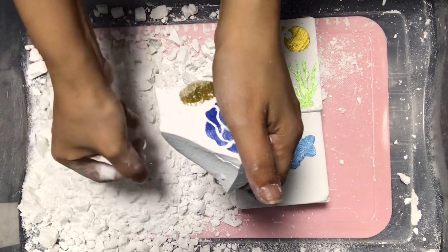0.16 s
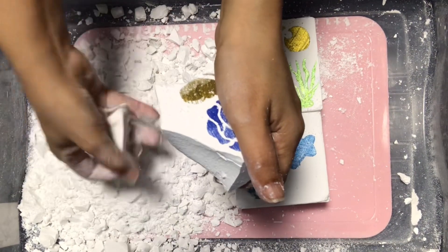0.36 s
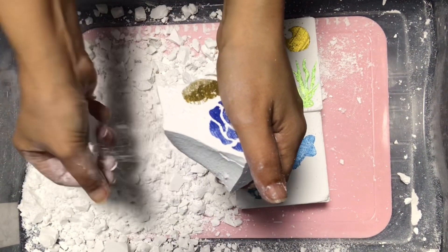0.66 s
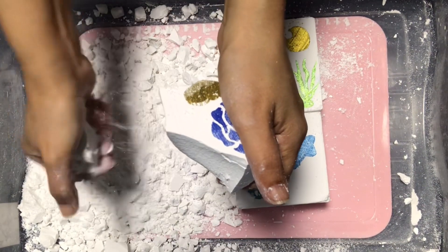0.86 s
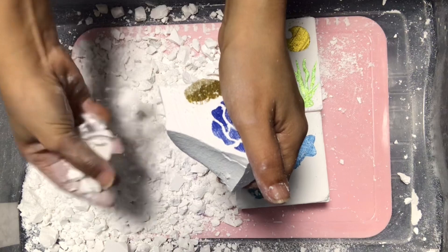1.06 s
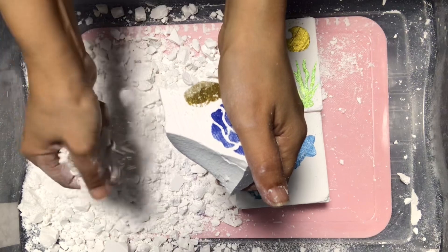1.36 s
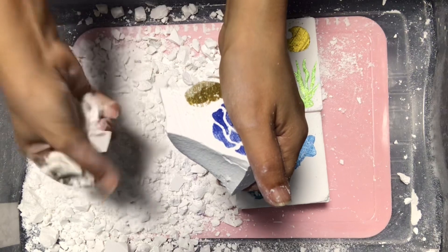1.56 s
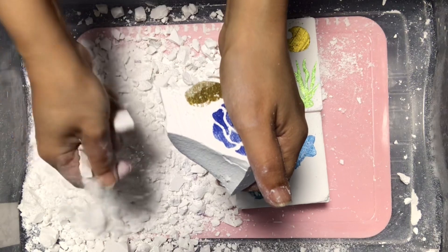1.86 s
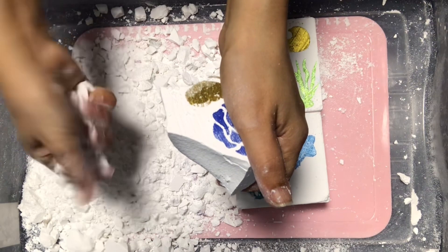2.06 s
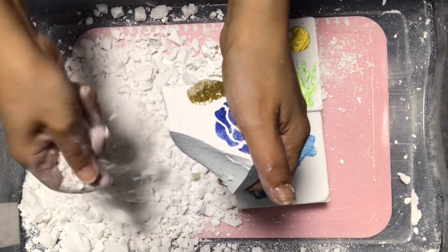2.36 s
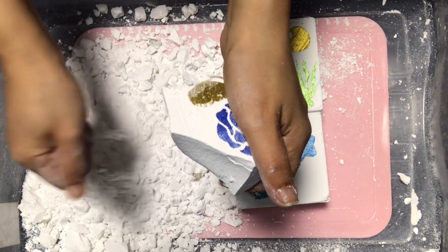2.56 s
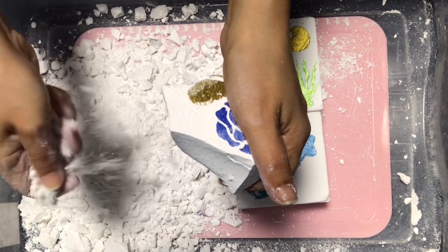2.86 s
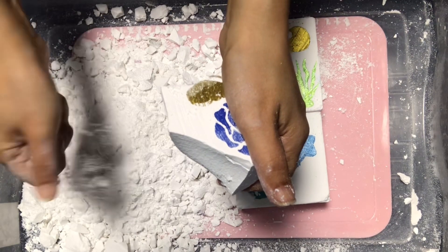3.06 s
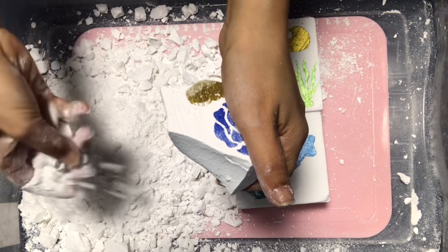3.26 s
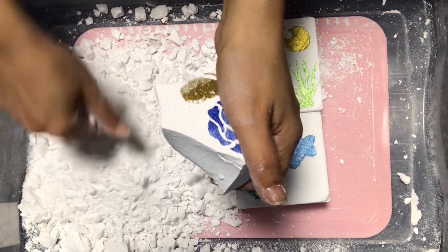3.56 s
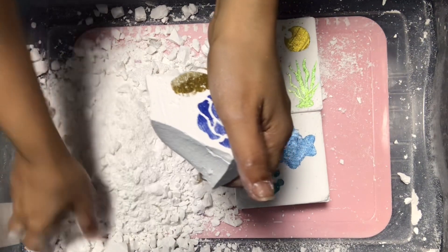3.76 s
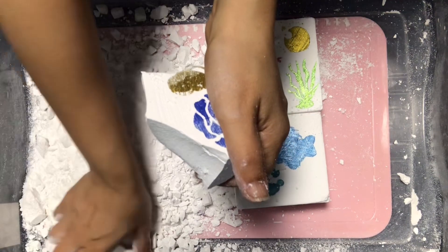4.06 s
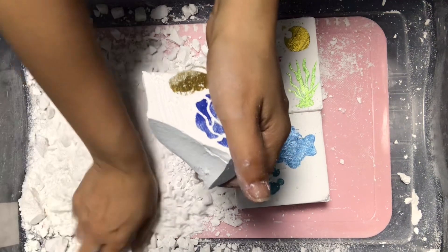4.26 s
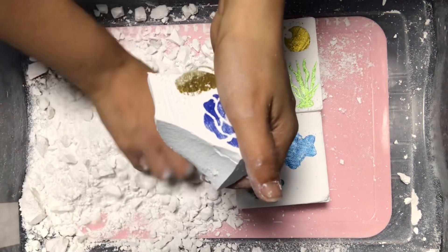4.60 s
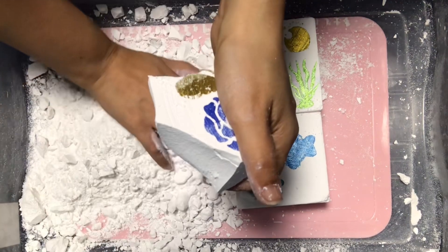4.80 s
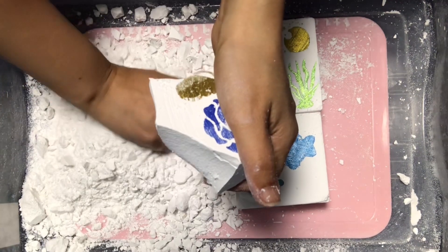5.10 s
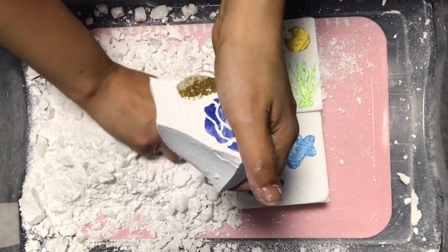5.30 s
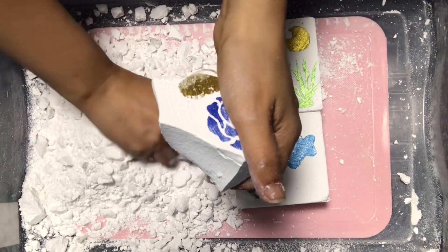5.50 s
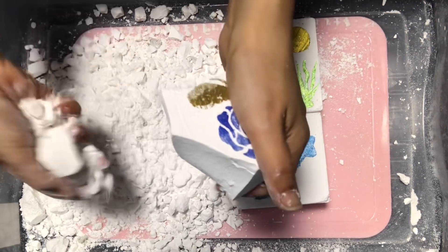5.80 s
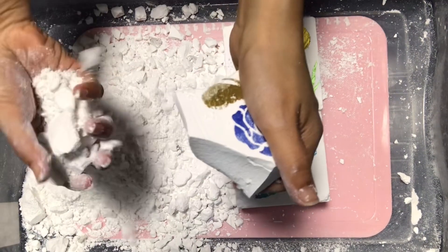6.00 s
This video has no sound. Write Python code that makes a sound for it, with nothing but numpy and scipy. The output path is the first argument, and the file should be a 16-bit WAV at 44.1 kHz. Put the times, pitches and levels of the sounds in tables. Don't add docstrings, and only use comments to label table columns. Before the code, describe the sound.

Brittle chalk breaks in a squeezing fist, close to the microphone, in dense bursts of sharp cracks, the loudest slightly overloaded. Bright splinters tick and small pieces drop onto a plastic tray. Later the hand rakes powdery crumbs in short rough strokes with low bumps and clacking lumps, then pauses and lightly squeezes a last handful. The room is dry and quiet.

```python
import sys
import numpy as np
from scipy import signal
from scipy.fft import rfft, irfft, next_fast_len
from scipy.io import wavfile

SR = 44100
rng = np.random.default_rng(int(sys.argv[2]) if len(sys.argv) > 2 else 0)


def ratio_of_db(decibels):
    return 10 ** (np.asarray(decibels, float) / 20)


def wav_out(sig):
    wavfile.write(sys.argv[1], SR, np.round(np.clip(np.atleast_2d(sig).T, -1, 1) * 32767).astype(np.int16))


N = 270774


def rms_one(x):
    return x / np.sqrt(np.mean(x ** 2) + 1e-20)


def peak_one(x):
    return x / (np.max(np.abs(x)) + 1e-20)


def band(x, low_hz, high_hz, order=2):
    edges_hz = [low_hz, min(high_hz, 0.45 * SR)]
    return signal.sosfilt(signal.butter(order, edges_hz, "band", fs=SR, output="sos"), x)


def resonate(x, hz, width_hz):
    r = np.exp(-np.pi * width_hz / SR)
    poles = [1, -2 * r * np.cos(2 * np.pi * hz / SR), r * r]
    return signal.lfilter(np.array([1, 0, -1]) * (1 - r * r) / 2, poles, x)


def colour(x, spectrum):
    size = next_fast_len(N)
    hz, level_db = np.transpose(spectrum)
    bins_hz = np.arange(size // 2 + 1) * SR / size
    gain = ratio_of_db(np.interp(np.log(bins_hz + 1), np.log(hz), level_db))
    return rms_one(irfft(rfft(x, size) * gain, size)[:N])


def drift(rate_hz):
    r = np.exp(-2 * np.pi * rate_hz / SR)
    slow = signal.lfilter([1], [1, -2 * r, r * r], rng.standard_normal(N + SR))
    return rms_one(slow[SR:])


def grains(per_s, spread_db, clump_db, clump_rate_hz):
    sizes = ratio_of_db(spread_db * np.minimum(rng.exponential(1, N), 3.6)) * rng.choice([-1, 1], N)
    born = rng.random(N) < per_s / SR
    return rms_one(sizes * born * ratio_of_db(clump_db * drift(clump_rate_hz)) + 1e-18)


def add(out, start_s, x):
    i = round(start_s * SR)
    out[i:i + len(x)] += x[:N - i]


# hz, density_db
ROOM_SPECTRUM = [(24, -74), (45, 0), (90, 3.5), (430, -5.5), (620, -6), (4700, -20), (15800, -25),
                 (17000, -64)]


def room():
    return ratio_of_db(-43) * colour(rng.standard_normal(N), ROOM_SPECTRUM)


def echoes(x):
    t = np.arange(SR // 4) / SR
    t60_s, first_echo_s = 0.14, 0.002
    tail = rng.standard_normal(len(t)) * ratio_of_db(-60 * t / t60_s) * (t > first_echo_s)
    tail = band(tail, 430, 7200, order=1)
    return ratio_of_db(-19) * signal.fftconvolve(x, tail / np.sqrt(np.sum(tail ** 2)))[:N]


def swells(moves, rest_db):
    rise_db_per_s, fall_db_per_s = 383, 266
    t = np.arange(0, N + 32, 32) / SR
    power = ratio_of_db(2 * rest_db)
    for start_s, length_s, level_db in moves:
        rise_loss_db = rise_db_per_s * np.maximum(start_s - t, 0)
        fall_loss_db = fall_db_per_s * np.maximum(t - start_s - length_s, 0)
        power = power + ratio_of_db(2 * (level_db - np.minimum(rise_loss_db + fall_loss_db, 80)))
    return np.interp(np.arange(N) / SR, t, 10 * np.log10(power))


# start_s, length_s, grit_db, rain_db (crumbs raining on the tray)
SQUEEZES = [(0, 0.01, -30.5, -44.5), (0.062, 0.011, -33, -47), (0.19, 0.033, -57, -36),
            (0.389, 0.012, -34.5, -44), (0.523, 0.17, -42, -59), (0.786, 0.024, -29.5, -42),
            (0.953, 0.069, -38.5, -61), (1.09, 0.11, -36.5, -45.5), (1.246, 0.1, -32.5, -44),
            (1.396, 0.032, -34, -49), (1.525, 0.13, -41.5, -52), (1.705, 0.057, -38.5, -45.5),
            (1.865, 0.076, -33.5, -40.5), (2.002, 0.16, -42, -41), (2.237, 0.088, -38, -41.5),
            (2.366, 0.15, -36.5, -41), (2.686, 0.025, -38, -61), (2.847, 0.21, -40, -49),
            (3.268, 0.18, -43, -46.5), (3.485, 0.041, -34.5, -36), (3.63, 0.035, -43, -39.5),
            (5.936, 0.098, -48.5, -42)]
# start_s, length_s, drag_db, dull_share_db, bright_share_db
STROKES = [(3.788, 0.043, -36, -4, -12), (3.898, 0.069, -38, -1.5, -2.5), (3.96, 0.021, -46.5, 5, 0),
           (4.017, 0.047, -33.5, -2.5, -5), (4.106, 0.11, -41, 0, -1), (4.193, 0.039, -46, 1, 3),
           (4.246, 0.019, -39.5, 3, 6.5), (4.284, 0.092, -39, -4, -8), (4.404, 0.19, -46.5, -5.5, -9),
           (4.558, 0.1, -41.5, -5.5, -10.5), (4.74, 0.053, -40.5, -7.5, -8),
           (4.886, 0.029, -37.5, -4.5, -8), (4.951, 0.021, -34.5, -7, -11), (5.01, 0.032, -33.5, -7.5, -15),
           (5.104, 0.025, -34, -4, -11), (5.174, 0.052, -37, -3.5, -11), (5.302, 0.0081, -30, -9, -13),
           (5.356, 0.025, -32.5, -12, -15.5), (5.445, 0.036, -38.5, -3, -13)]
# grit_db, drag_db, rumble_db, dull_db, bright_db
REST_DB = [-51, -58, -54.5, -54, -52]


def hand():
    dust_db, rain_drag_db, stroke_rumble_db = -16.5, -11, 4
    grit = [(s, n, grit_db) for s, n, grit_db, _ in SQUEEZES]
    dust = [(s, n, grit_db + dust_db) for s, n, grit_db in grit]
    rain = [(s, n, rain_db) for s, n, _, rain_db in SQUEEZES]
    rain_drag = [(s, n, rain_db + rain_drag_db) for s, n, rain_db in rain]
    drag = [(s, n, drag_db) for s, n, drag_db, _, _ in STROKES]
    rumble = [(s, n, drag_db + stroke_rumble_db) for s, n, drag_db in drag]
    dull = [(s, n, drag_db + share_db) for s, n, drag_db, share_db, _ in STROKES]
    bright = [(s, n, drag_db + share_db) for s, n, drag_db, _, share_db in STROKES]
    moves = [grit, rain_drag + drag, rain + rumble, dust + dull, dust + bright]
    return [swells(each, rest_db) for each, rest_db in zip(moves, REST_DB)]


def rolling(level_db, peaks, per_s):
    knocks = grains(per_s, spread_db=3.0, clump_db=2.2, clump_rate_hz=28)
    out = np.zeros(N)
    for hz, width_hz, peak_db in peaks:
        out += ratio_of_db(peak_db) * resonate(resonate(knocks, hz, width_hz), hz, width_hz)
    return ratio_of_db(level_db) * rms_one(out)


# pitch_hz, width_hz, level_db
TRAY_PEAKS = [(131.5, 102, 0.5), (233.3, 48.5, 6.5), (350, 176, 3.5), (460, 150, -0.5), (532, 770, -10.5)]


def rumble(level_db):
    return rolling(level_db, TRAY_PEAKS, per_s=1800)


# pitch_hz, width_hz, level_db
DRAG_PEAKS = [(760, 550, 1), (1147, 410, 6.5), (1853, 180, 10), (2210, 210, 5.5), (2560, 620, -1.5),
              (2980, 240, -6)]


def drag(level_db):
    return rolling(level_db, DRAG_PEAKS, per_s=1500)


def powder(level_db, spectrum, patchy_db):
    return ratio_of_db(level_db + patchy_db * drift(32)) * colour(rng.standard_normal(N), spectrum)


# hz, density_db
DULL_POWDER = [(1500, -11), (2500, -1), (4500, 0.5), (6500, -3.5), (10000, -30), (17000, -40)]


def dull_powder(level_db):
    return powder(level_db, DULL_POWDER, patchy_db=2.2)


# hz, density_db
BRIGHT_POWDER = [(3500, -18), (6000, -4), (8000, -0.5), (13500, -11.5), (15700, -6.5), (16300, -40)]


def bright_powder(level_db):
    return powder(level_db, BRIGHT_POWDER, patchy_db=1.8)


# hz, density_db
GRIT_SPECTRUM = [(1200, -3), (2000, -3.5), (4700, -1.5), (8000, -3.5), (12000, -10), (15800, -4),
                 (17000, -64)]


def grit(level_db):
    edges_hz = np.geomspace(1200, 18000, 8)
    out = np.zeros(N)
    for low_hz, high_hz in zip(edges_hz, edges_hz[1:]):
        clicks = grains(per_s=1500, spread_db=4.6, clump_db=3.0, clump_rate_hz=45)
        out += band(clicks, low_hz, high_hz, order=1)
    return ratio_of_db(level_db) * colour(out, GRIT_SPECTRUM)


def squeak():
    start_s, note_s, scrape_s = 3.819, 0.003, 0.0066
    pitch_hz, rise_hz_per_s = 2250, 21000
    t = np.arange(N) / SR - start_s
    phase = 2 * np.pi * (pitch_hz * t + 0.5 * rise_hz_per_s * t * t)
    note = ratio_of_db(2.5 * drift(150)) * (np.sin(phase) + ratio_of_db(-22) * np.sin(2 * phase))
    note = np.exp(-0.5 * (t / note_s) ** 2) * note
    scrape = rms_one(resonate(rng.standard_normal(N), pitch_hz, 900))
    scrape = np.exp(-0.5 * (t / scrape_s) ** 2) * scrape
    return ratio_of_db(-17.5) * (note + ratio_of_db(-10) * scrape)


# start_s, level_db, pitch_hz, t60_s
THUDS = [(0.054, -22.5, 506, 0.012), (0.168, -14, 378, 0.022), (0.193, -18.5, 420, 0.093),
         (0.534, -25.5, 426, 0.029), (0.62, -21.5, 405, 0.017), (0.77, -11.5, 420, 0.016),
         (1.128, -23, 420, 0.031), (1.85, -33, 580, 0.041), (1.882, -15.5, 262, 0.051),
         (2.027, -18.5, 276, 0.046), (2.236, -25, 255, 0.043), (2.358, -27, 230, 0.034),
         (2.413, -24.5, 460, 0.099), (3.481, -27.5, 261, 0.048)]
# start_s, level_db, pitch_hz, t60_s
SHOVES = [(3.784, -23.5, 200, 0.05), (3.834, -19.5, 408, 0.087), (3.922, -15, 422, 0.05),
          (4.011, -11.5, 237, 0.094), (4.035, -31, 220, 0.062), (4.059, -11, 368, 0.04),
          (4.176, -34, 355, 0.09), (4.24, -30, 294, 0.079), (4.287, -11.5, 371, 0.032),
          (4.646, -31, 204, 0.093), (4.893, -26.5, 291, 0.17), (4.942, -16.5, 457, 0.095),
          (5.03, -23, 260, 0.071), (5.087, -30, 504, 0.12), (5.174, -37, 350, 0.066),
          (5.292, -20, 349, 0.18), (5.343, -21, 362, 0.083), (5.465, -23, 384, 0.041)]
# start_s, level_db, pitch_hz, t60_s
BUMPS = [
    (3.77, -30.5, 75.4, 0.28),
    (3.932, -36, 59.5, 0.17),
    (4.011, -28, 99, 0.13),
    (4.07, -37, 60, 0.44),
]
# start_s, level_db, pitch_hz, t60_s
DROPS = [
    (2.668, -36, 460, 0.047),
    (2.734, -44, 270, 0.053),
    (2.848, -43, 340, 0.057),
    (2.888, -31.5, 407, 0.055),
    (2.97, -39, 189, 0.067),
    (3.086, -39, 229, 0.065),
    (3.139, -32.5, 238, 0.13),
    (3.312, -33, 227, 0.06),
    (3.566, -33, 440, 0.068),
    (3.638, -31, 420, 0.078),
]


def thuds():
    tray_low_hz, tray_high_hz, low_lasts = 238, 420, 0.85
    out, t = np.zeros(N), np.arange(5000) / SR
    sagging = 2 * np.pi * (t + 0.00099 * (1 - np.exp(-t / 0.0019)))
    for start_s, level_db, pitch_hz, t60_s in THUDS + SHOVES + BUMPS + DROPS:
        shift = rng.random(2) * 2 * np.pi
        t60_s = max(t60_s, 0.01)
        partner_hz, lasts = (tray_low_hz, low_lasts) if pitch_hz > 320 else (tray_high_hz, 1 / low_lasts)
        ring = np.sin(pitch_hz * sagging) + 0.26 * np.sin(1.457 * pitch_hz * sagging + shift[0])
        ring = ring * ratio_of_db(-60 * t / t60_s)
        partner = ratio_of_db(-4.5 - 60 * t / (lasts * t60_s)) * np.sin(partner_hz * sagging + shift[1])
        partner = partner * (pitch_hz > 150)
        push = np.minimum(t / 0.0033, 1)
        add(out, start_s + 0.0018, ratio_of_db(level_db + 2) * peak_one((ring + partner) * push))
    return out


# start_s, pitch_hz, level_db, t60_s
CLINKS = [
    (.081, 10450, -26, .024),
    (.172, 10700, -30, .045),
    (3.637, 8790, -22, .05),
    (.773, 2245, -7, .035),
    (.774, 2600, -14, .05),
    (.784, 2430, -21, .07),
    (.772, 3985, -5, .04),
    (.773, 1570, -11, .04),
]


def clinks():
    out, t = np.zeros(N), np.arange(4096) / SR
    for start_s, pitch_hz, level_db, t60_s in CLINKS:
        add(out, start_s, ratio_of_db(level_db - 60 * t / t60_s) * np.sin(2 * np.pi * pitch_hz * t))
    return out


# start_s, level_db, pitch_hz
SPLINTERS = [(0.2905, -15, 7000), (0.169, -5, 10700), (0.2025, 3, 9000), (0.2414, -16, 8720),
             (0.6219, -7, 7400), (0.743, -19, 7190), (1.2464, -9, 7050), (1.268, 15.5, 7600),
             (1.2844, 0, 8660), (1.3144, -4, 8420), (1.741, -14, 7270), (1.7674, -10, 8300),
             (1.83, -5, 14800), (1.8504, -22, 10200), (1.8736, -5, 8150), (1.8817, -7, 10100),
             (2.027, -6.5, 9070), (2.6973, -12, 7810), (2.866, -21, 10500), (3.485, -4.5, 8500),
             (2.618, -18, 8000), (4.941, -16, 8840), (5.0155, -17, 7440), (5.035, -13, 7210),
             (5.1028, -15, 7710), (5.1147, -13.5, 10000), (5.4612, -8, 10300), (5.9083, -14, 8300),
             (5.9256, -8, 11800), (5.9692, -23, 8400), (6.031, -19, 9500), (6.0829, -21, 7670),
             (6.1233, -20, 8700)]
# start_s, level_db, pitch_hz
TICKS = [(0.266, -16, 4900), (0.4888, -22, 5740), (0.8784, -17, 3900), (0.9373, -22, 3610),
         (1.2308, -15, 4200), (1.283, -5, 3970), (1.36, -18, 3630), (1.399, -12, 6980), (1.516, -14, 3800),
         (1.5745, -16.5, 2750), (1.711, -18, 3620), (1.7384, -9, 5590), (1.878, -5, 5640),
         (1.9354, -25, 5610), (2.014, -16, 5600), (2.106, -18, 4050), (2.183, -18, 3150),
         (2.2753, -12, 3400), (2.328, -19, 3110), (2.824, -17, 4860), (3.3109, -19, 5760),
         (3.7806, -16, 2740), (4.557, -17, 3250), (5.007, -13, 2760), (5.0868, -24, 2740),
         (5.1434, -22, 2950), (2.3948, -11, 9000), (5.3053, -26, 3120), (5.3224, -15.5, 5110),
         (3.322, -19, 5500), (3.994, -16, 9100), (5.3734, -13, 3330), (5.3994, -16, 2990)]
# start_s, level_db, pitch_hz
TAPS = [
    (1.9164, -21, 2360),
    (2.0187, -14, 1840),
    (2.069, -18, 1020),
    (3.9534, -13.5, 1350),
    (3.9888, -13, 1730),
    (4.9945, -11, 1910),
]
# start_s, level_db, pitch_hz
SPARKS = [(.0095, -14, 14500), (.135, -28, 13000), (0.169, 2, 14500), (.203, -8, 14500), (.292, -13, 12500),
          (.366, -15, 13000), (0.623, -1, 13500), (.708, -27, 14500), (1.2845, -12, 13500),
          (1.341, -12, 14500), (1.415, -16, 14500), (1.744, -5, 14000), (1.851, -23, 14500),
          (1.884, -18, 14000), (1.9165, -17, 14000), (3.783, -7.5, 5400), (4.179, -26, 14800),
          (5.378, -9, 5460)]


def splinters():
    run_on_s, width = 0.014, 0.38
    out, t = np.zeros(N), np.arange(1024) / SR
    for start_s, level_db, pitch_hz in SPLINTERS + TICKS + TAPS + SPARKS:
        uneven_db = 8 * rng.standard_normal(len(t))
        burst = rng.standard_normal(len(t)) * ratio_of_db(uneven_db - 60 * t / run_on_s)
        ring = resonate(resonate(burst, pitch_hz, width * pitch_hz), pitch_hz, 2 * width * pitch_hz)
        add(out, start_s, ratio_of_db(level_db - 9.5) * peak_one(ring))
    return out


# start_s, level_db, pitch_hz
SNAPS = [(0.1086, -24, 5000), (0.4666, -12.5, 4400), (0.7089, -19, 6500), (0.7634, -16, 5600),
         (0.7693, -10, 4200), (1.1429, -19, 4560), (1.1788, -3, 7500), (1.441, -20, 4200),
         (1.9014, -15, 6600), (1.9162, -17, 9200), (1.9272, -21, 7100), (2.0036, -21, 4700),
         (2.3774, -3, 3140), (2.4495, -23, 5000), (2.8322, -19.5, 5700), (2.8914, -20, 3850),
         (2.9519, -22, 3280), (2.97, -18, 6600), (3.4274, -19, 7900), (3.6292, -22, 7000),
         (4.4451, -24, 4100), (5.9266, -12, 4600), (6.0169, -19, 8100), (6.0658, -18, 7200),
         (.5364, -5, 3600),
    (2.2343, -14, 4500),
    (2.4165, -5.5, 3500),
    (2.4378, -5, 6500),
    (2.489, -11, 6500),
    (2.519, -7.5, 3900),
    (3.0341, -17, 3600),
]


def snaps():
    cycles, crumble_s = 0.42, 0.016
    out, t = np.zeros(N), np.arange(-32, 992) / SR
    for start_s, level_db, pitch_hz in SNAPS:
        phase = rng.uniform(0, 2 * np.pi)
        swing = np.exp(-0.5 * (t * pitch_hz / cycles) ** 2) * np.cos(2 * np.pi * pitch_hz * t + phase)
        crumble = rng.standard_normal(len(t)) * (t > 0) * ratio_of_db(-60 * t / crumble_s)
        crumble = peak_one(band(crumble, 0.59 * pitch_hz, 1.8 * pitch_hz, order=1))
        add(out, start_s + t[0], ratio_of_db(level_db) * (peak_one(swing) + ratio_of_db(-15) * crumble))
    return out


def cracks(table, run_on_s, width):
    out, t = np.zeros(N), np.arange(2048) / SR
    for start_s, low_hz, low_db, high_hz, high_db in table:
        hiss_db = high_db - 17 + 16.5 * np.log2(high_hz / 4000)
        slips = rng.standard_normal(len(t)) * ratio_of_db(5.72 * rng.standard_normal(len(t)))
        hold_s = 0.00041 * max(low_db, high_db, 0)
        burst = slips * ratio_of_db(-60 * np.maximum(t - hold_s, 0) / run_on_s) * np.minimum(t / 0.000053, 1)
        burst[16] += 12 * np.sign(slips[0])
        low = band(resonate(burst, low_hz, width * low_hz) + ratio_of_db(-14) * burst, 680, 2450)
        high = band(resonate(burst, high_hz, width * high_hz) + ratio_of_db(-13) * burst, 3230, 10830)
        hiss = band(burst, 4400, 12600) + ratio_of_db(-19) * band(burst, 11600, 13100)
        rings = ratio_of_db(low_db) * peak_one(low) + ratio_of_db(high_db) * peak_one(high)
        add(out, start_s, rings + ratio_of_db(hiss_db) * peak_one(hiss))
    return out


# start_s, level_db, pitch_hz, edge_share_db
KNOCKS = [(3.777, -15, 1500, -12), (3.7815, 1.5, 1630, -27), (3.791, -14.5, 1230, -13),
          (3.8358, -4.5, 1660, -32), (3.923, -16, 845, -14), (4.059, -7.5, 1430, -25),
          (4.178, -16.5, 1270, -14), (4.289, -10, 1070, -22), (4.943, -23, 1930, -12),
          (5.034, -12.5, 2060, -6), (5.104, -19, 1180, -14), (5.114, -14.5, 1950, -9),
          (5.119, -20, 1900, -15), (5.305, -12, 1830, -22), (5.376, -19, 1860, -7),
          (4.011, -20.5, 1500, -5), (5.46, -18.5, 1850, 6), (5.466, -17.5, 1820, -7)]


def knocks():
    table = [(start_s, pitch_hz, level_db, 3400, level_db + edge_db - 0.5)
             for start_s, level_db, pitch_hz, edge_db in KNOCKS]
    return cracks(table, run_on_s=0.008, width=0.25)


# start_s, level_db, high_hz, low_hz,
# low_share_db
LUMP_BREAKS = [(0.0094, -6.5, 7960, 2480, -17), (0.0553, -10, 6500, 1580, -27),
               (0.0619, 1, 5140, 1070, -19.5), (0.072, -12, 3090, 2610, -3.5),
               (0.113, -22, 4000, 1460, -25), (0.17, -13, 3560, 1330, -8), (0.1946, -14.5, 3900, 1480, 4),
               (0.203, -4, 4900, 1910, -12), (0.207, -10.5, 2870, 1230, -4),
               (0.2946, -20.5, 4940, 2600, -6.5), (0.381, -16.5, 4040, 2820, -13),
               (0.4511, -15.5, 3840, 1450, -15.5), (0.4656, -15, 4740, 1550, -14),
               (0.526, -16, 3650, 930, -9), (0.536, -4.5, 3700, 2840, -8.5),
               (0.5444, -6.5, 3480, 1530, -17), (0.5631, -11.5, 3900, 2780, -12),
               (0.5983, -11, 3500, 2740, -10.5), (0.6216, 0, 3280, 1550, -13.5),
               (0.6344, -7.5, 5600, 1520, -33), (0.7178, -6.5, 4630, 1900, -22),
               (0.7681, -18, 4020, 2900, -3), (0.7715, 5, 3900, 1580, -10.5), (0.787, -15, 3950, 2580, -9),
                (0.8131, -7, 4010, 1620, -24), (0.825, -17.5, 3970, 2500, -10),
                (1.0545, -19, 3440, 2650, -13), (1.0784, -9.5, 2690, 2370, -15),
                (1.1288, -0.5, 3320, 1390, -13.5), (1.16, -12.5, 5740, 1970, -15),
                (1.178, -15, 3570, 2760, -18), (1.217, -11.5, 3950, 2870, -21),
                (1.2404, -16.5, 7110, 1610, -9), (1.253, -5, 5670, 1250, -27),
                (1.2649, 1.5, 3870, 2250, -23), (1.268, 4.5, 3970, 2700, -16),
                (1.288, 0, 3800, 2200, -13.5), (1.3006, -2, 4650, 2250, -14),
                (1.3112, -5.5, 5500, 2210, -21), (1.3372, -0.5, 5160, 2670, -17),
                (1.383, -17, 6190, 2770, -16), (1.4055, -3, 7200, 2780, -20.5),
                (1.4153, -16, 5280, 1520, -14), (1.4242, -8, 5800, 1410, -15),
               (1.742, -7.5, 5610, 2220, -16.5), (1.7593, -16, 5700, 2250, -21), (1.769, -16.5, 3920, 2550, -13),
          (1.812, -10, 3840, 2900, -14), (1.817, -16, 4850, 2730, -12), (1.83, -13.5, 3950, 2670, -8.5),
          (1.84, -9.5, 3990, 2900, -16), (1.865, -14, 5000, 1950, -13.5), (1.882, -13, 5700, 2400, -10.5),
          (1.894, -16, 3170, 1140, -10.5), (1.9075, -11, 4170, 2240, -11), (1.9733, -19.5, 5530, 2760, -11),
          (2.0237, -23.5, 4830, 980, 4), (2.037, -0.5, 5600, 1850, -10), (2.2334, -11, 5600, 1900, -12),
          (2.237, -8, 4770, 1170, -25), (2.3548, -16, 3450, 2640, -10), (2.377, -14, 3470, 2600, -14),
          (2.4156, -13.5, 3900, 900, -11.5), (2.4217, -11.5, 3470, 2050, -11.5),
          (2.437, -12.5, 5300, 1130, -15), (2.4802, -6.5, 5200, 2800, -13), (2.499, -11.5, 3800, 2380, -16),
          (2.5177, -7, 3500, 2760, -40),
               (2.489, -15, 3900, 2450, -13), (2.545, -21, 3160, 1260, -10.5),
               (2.6124, -14, 3330, 1520, -9.5), (2.663, -17, 3460, 2840, -14),
               (2.6676, -13, 3670, 2240, -9.5), (2.889, -17.5, 3220, 1930, -11),
               (2.9982, -6, 3480, 2350, -15.5), (3.033, -15.5, 3500, 2810, -14),
               (3.0491, -5, 3070, 2250, -17), (3.1406, -19.5, 3740, 870, -12.5),
               (3.267, -17.5, 3220, 1960, -9), (3.457, -15, 3130, 1450, -13),
               (3.485, -19.5, 4750, 816, -12), (3.5095, -13, 3700, 1700, -7), (3.623, -16, 5000, 2620, -14),
               (3.6355, -9, 6300, 960, -15.5), (3.647, -27.5, 5280, 810, 4.5),
               (5.908, -16.5, 3180, 1710, -11), (5.926, -11, 3240, 2730, -10.5),
               (5.9818, -24, 4200, 1680, -8), (6.0157, -29, 5930, 1290, -28), (6.0644, -31, 4350, 802, -20),
               (6.1354, -18.5, 2880, 2630, -8)]


def breaks():
    table = [(start_s, low_hz, level_db + share_db + 5.5, high_hz, level_db)
             for start_s, level_db, high_hz, low_hz, share_db in LUMP_BREAKS]
    return cracks(table, run_on_s=0.021, width=0.26)


def scene():
    grit_db, drag_db, rumble_db, dull_db, bright_db = hand()
    crumbs = rumble(rumble_db) + drag(drag_db)
    crumbs += dull_powder(dull_db) + bright_powder(bright_db) + grit(grit_db)
    blows = squeak() + thuds() + clinks() + splinters() + snaps() + knocks() + breaks()
    return (room() + crumbs + blows + echoes(blows))[None]


# pitch_hz, width_hz, share_removed (0-1)
MIC_DIPS = [(6430, 720, 0.34), (14000, 1200, 0.03)]


def microphone(x):
    for pitch_hz, width_hz, share in MIC_DIPS:
        x = x - share * resonate(x, pitch_hz, width_hz)
    return np.clip(x, -1, 1)


def roll_off(x):
    return signal.sosfilt(signal.butter(12, 15840, fs=SR, output="sos"), x)


def record(dry):
    mix = microphone(dry)
    return roll_off(mix)


dry = scene()
out = record(dry)
wav_out(out)
```